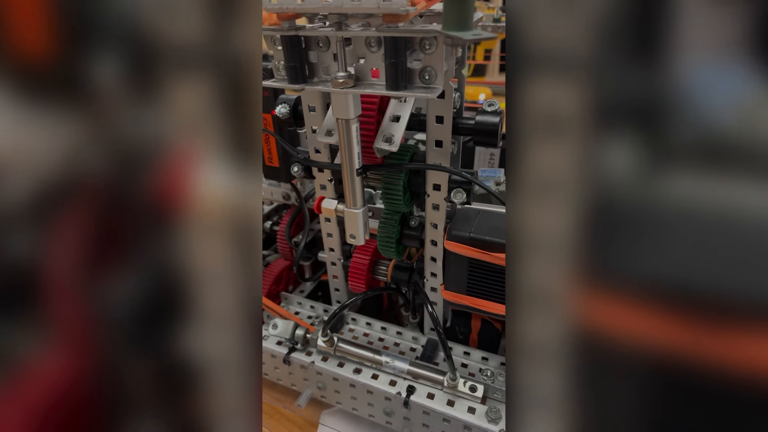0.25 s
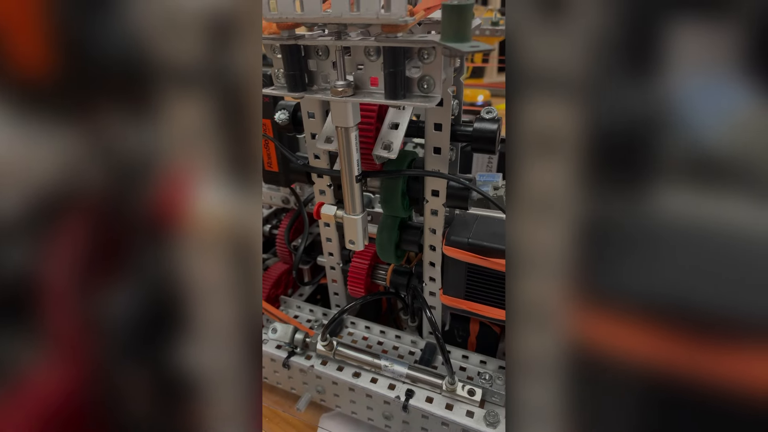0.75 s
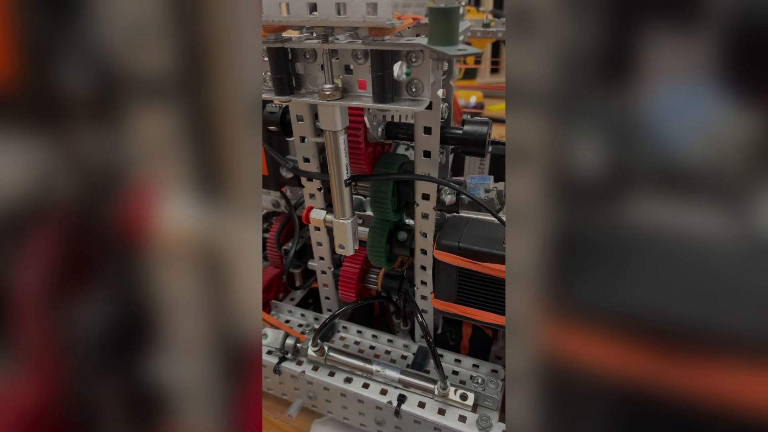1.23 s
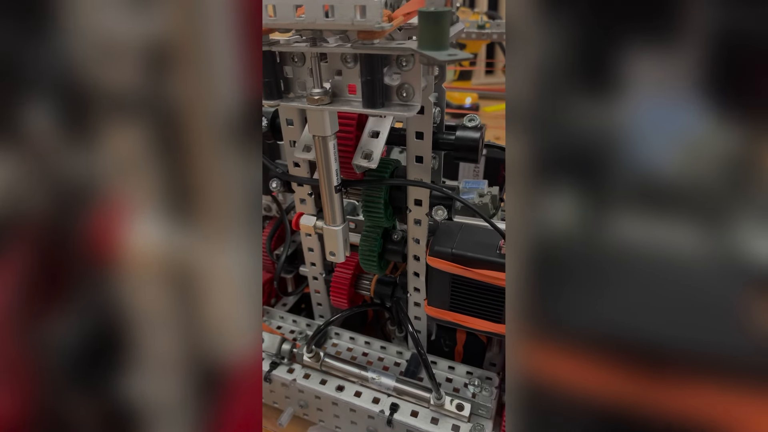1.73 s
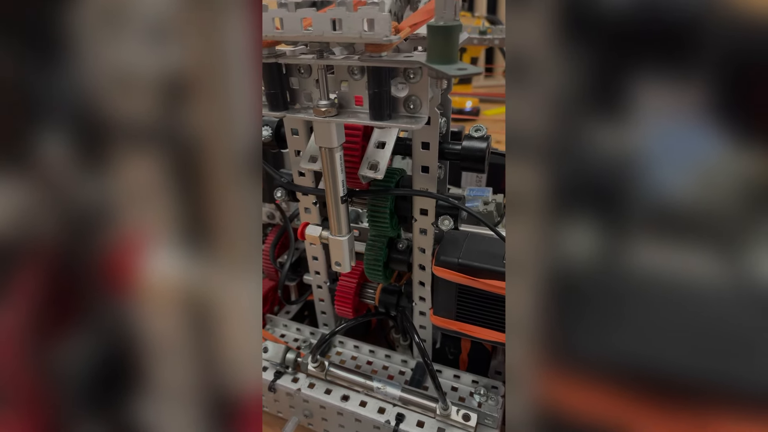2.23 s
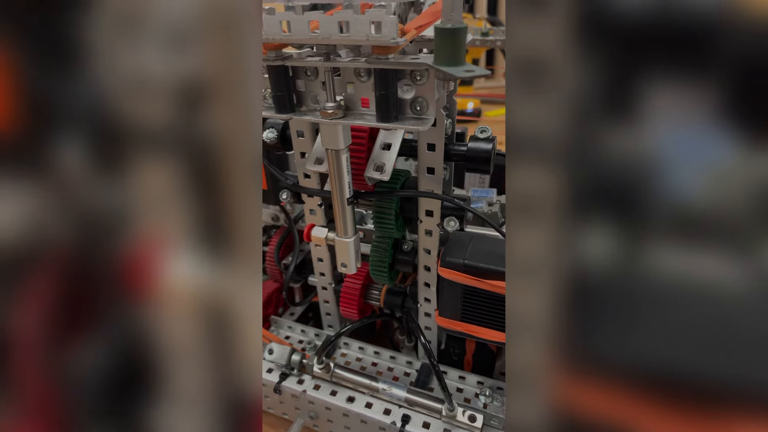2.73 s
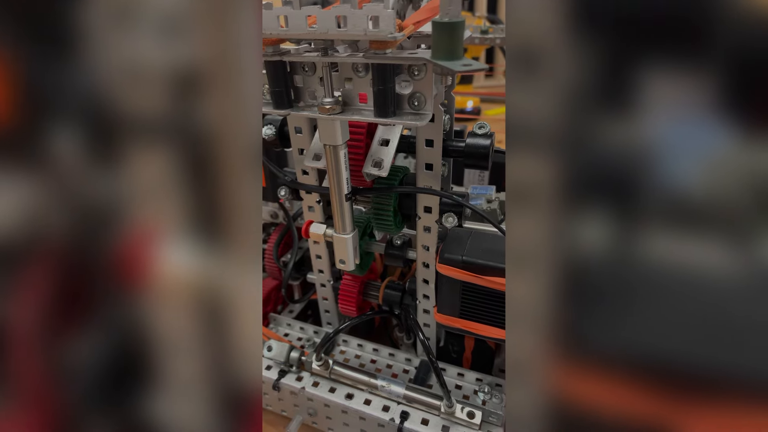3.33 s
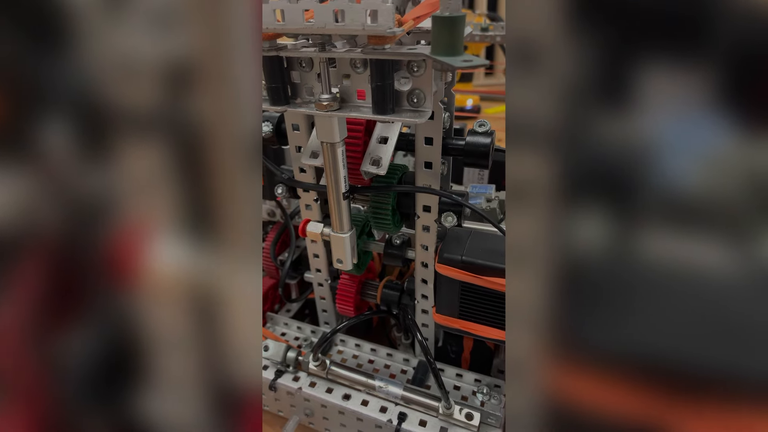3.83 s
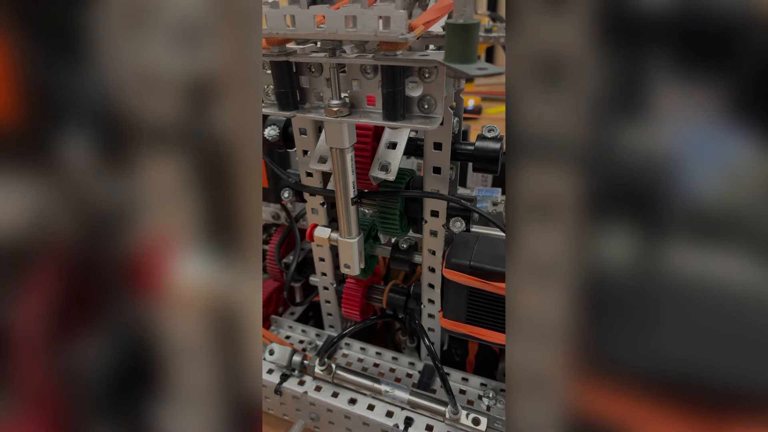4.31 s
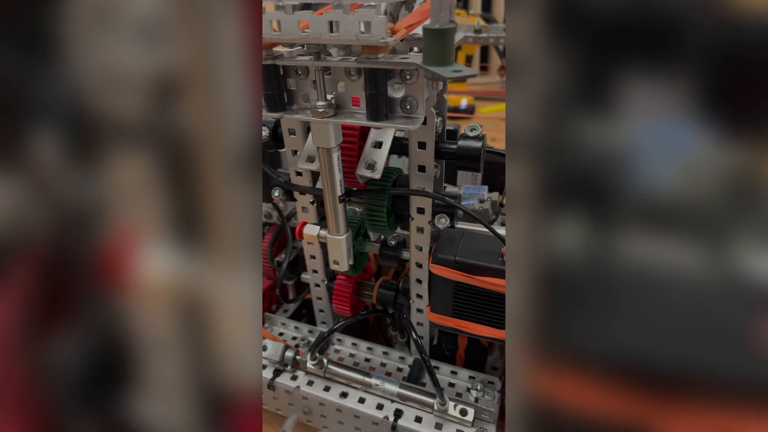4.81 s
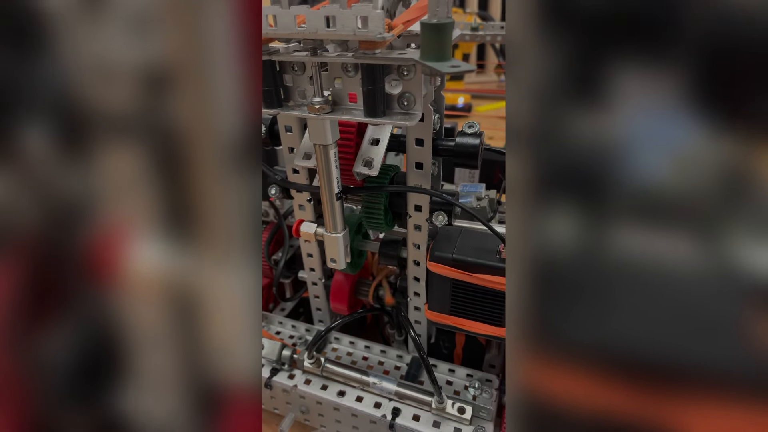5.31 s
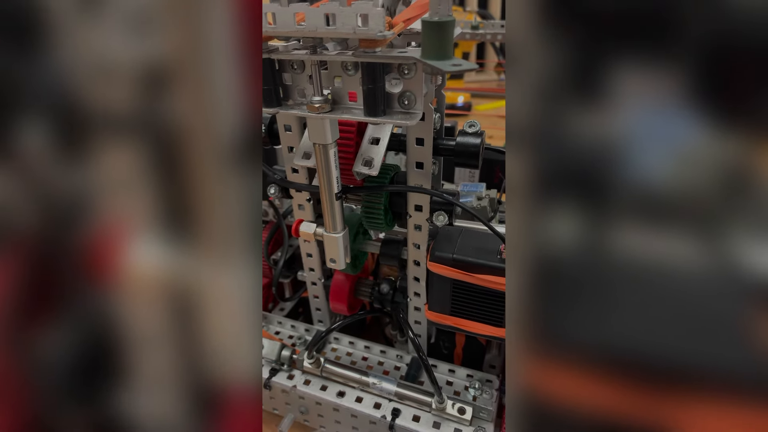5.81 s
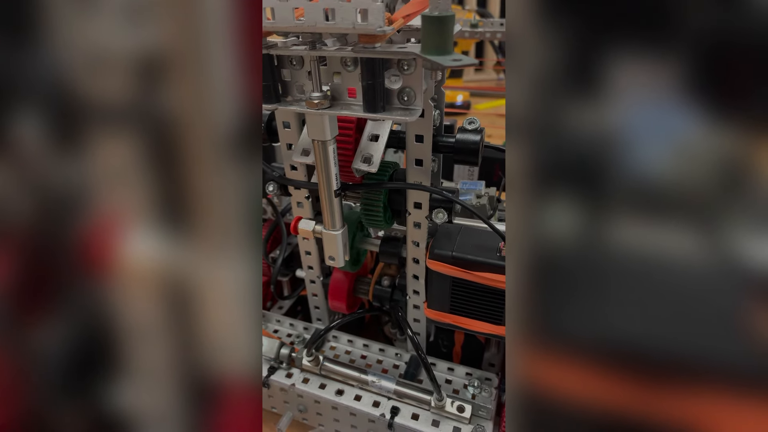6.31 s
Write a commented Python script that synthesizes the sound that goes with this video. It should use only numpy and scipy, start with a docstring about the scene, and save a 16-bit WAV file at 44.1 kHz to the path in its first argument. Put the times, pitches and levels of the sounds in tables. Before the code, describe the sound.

Close by in a faintly humming workshop, a valve knocks and hissing air drives a small robot's piston with a falling squeal and a low groan. The metal frame rattles and the piston hits its stop, leaving a faint hollow tone. Gears and linkage are clacked over by hand a few times, while parts clatter far off. The valve knocks again, and air spits, then hisses steadily to the end.

```python
"""A small pneumatic robot in a humming workshop, with parts clattering far off now and then.
At 0.5 s a valve knocks and air drives a groaning, squealing piston; from 1.3 s the frame rattles and
the piston hits its stop, leaving a faint hollow tone. Gears and linkage are clacked over by hand
(2.9-3.8 s). At 5 s the valve knocks again and the air spits, then hisses to the end.
A close pair of microphone ports hears the treble with a short lag between its sides."""
import sys
import numpy as np
from scipy import signal
from scipy.fft import rfft, irfft, next_fast_len
from scipy.io import wavfile
from scipy.ndimage import uniform_filter1d, map_coordinates

SR = 44100
rng = np.random.default_rng(int(sys.argv[2]) if len(sys.argv) > 2 else 0)


def unload_wav(signal):
    """Save mono or channel-first audio to the path in sys.argv[1] as 16-bit WAV at rate SR, clipped to [-1, 1]."""
    wavfile.write(
        sys.argv[1],
        SR,
        np.round(np.clip(np.atleast_2d(signal).T, -1, 1) * 32767).astype(np.int16),
    )


N = 289296
STROKE_OPEN_S = .58

# Air port spectrum during the stroke. Each row: frequency in Hz, relative level in dB.
PORT_SPECTRUM = [(20, -46.5), (100, -11), (550, -19), (1400, -5.5), (2300, -14.5), (3200, -3.5),
                 (4000, -2.5), (5500, -3.5), (6800, 0), (8300, -8), (10000, -5), (11000, -8.5),
                 (12500, -6.5), (15500, -11.5)]
# Air outlet resonances. Each row: centre in Hz, width in Hz, lift in dB.
OUTLET_RESONANCES = [(2870, 350, 4), (5660, 590, 5.5), (6300, 310, -5), (6900, 420, 6.5), (7400, 350, 5),
                     (7700, 250, -4.5), (8230, 320, 7.5), (9600, 250, 4.5), (9880, 250, 3),
                     (10648, 220, -4), (11096, 420, 12.5)]
# Bright spectrum of metal contact. Each row: frequency in Hz, relative level in dB.
SNAP_SPECTRUM = [(300, -41.5), (1500, -9), (2600, -10.5), (3500, -1), (5000, 3), (7000, -2), (9000, 3),
                 (11000, 0), (13000, -1), (15500, -7)]


def air(jerks):
    """Air surges until the line fills, then flows steadily: once for the stroke, once to blow off."""
    # Filling and blow-off spectra. Each row: frequency in Hz, relative level in dB.
    surge_spectrum = [(20, -46), (120, -11.5), (280, -18), (500, -23), (1000, -17.5), (1500, -16.5),
                      (2000, -5.5), (2350, -13), (3100, -3.5), (3900, -6), (4500, -6.5), (6000, 0),
                      (8700, 1), (10000, 0), (12500, -3.5), (15500, -3.5)]
    blow_off_spectrum = [(20, -51), (120, -14), (550, -22), (950, -15), (1300, -11), (2300, -14.5),
                         (3100, -4), (3900, -6.5), (5200, -3), (8500, 0.5), (10000, -3.5), (12500, -6),
                         (15500, -6)]
    # Brief swells of the hiss. Each row: time in seconds, lift in dB.
    spurts = [(.69, 3), (.795, 3), (5.06, 2.5), (5.235, 1.5), (5.54, 2.5), (5.65, 3), (6.06, 3),
              (6.19, 4.5)]
    t = np.arange(N) / SR
    swells = amp(sum(db * np.exp(-((t - s) / .021) ** 2) for s, db in spurts))
    surge = jet(surge_spectrum, patchy_db=2.9, flutter_db=2.0, flutter_hz=140)
    stroke = amp(-26.5) * jet(PORT_SPECTRUM, patchy_db=2.5, flutter_db=1.0, flutter_hz=130)
    stroke += amp(-20.5) * np.exp(-since(.79) / .03) * surge
    stroke *= envelope(STROKE_OPEN_S, end_s=1.268, attack_s=.032, fade_db_per_s=199.5)
    blow_off = amp(-25) * jet(blow_off_spectrum, patchy_db=1.64, flutter_db=1.13, flutter_hz=110)
    blow_off += amp(-20.8) * np.exp(-since(5.3) / .007) * surge
    blow_off *= envelope(4.99, end_s=N / SR, attack_s=.034)
    return swells * (jerks * stroke + blow_off)


def jet(spectrum, patchy_db, flutter_db, flutter_hz):
    """Outlet turbulence: the whole flutters, and each band flares and fades by itself."""
    bands = signal.stft(noise(spectrum, peaks=OUTLET_RESONANCES), nperseg=256)[2]
    flares = uniform_filter1d(rng.standard_normal(bands.shape[1:]), size=6, axis=0)
    flares = uniform_filter1d(flares, size=11, axis=1)
    patchy = signal.istft(bands * amp(patchy_db * unit(flares)), nperseg=256)[1][:, :N]
    return unit(amp(flutter_db * wobble(flutter_hz)) * patchy)


def piston_jerks(rate_hz=34.09, depth_db=1.5, drift=.015):
    """Gain that pumps as the piston creeps in regular jerks once air is let in."""
    moving = since(STROKE_OPEN_S) > 0
    cycles = np.cumsum(moving * rate_hz * (1 + drift * wobble(13))) / SR
    return unit(amp(-depth_db * np.sin(2 * np.pi * cycles)))


def seal_squeal(jitter=.012, waver=.007, flutter_db=3, rasp_db=2.7):
    """The sliding seal squeals; harmonics flare as they cross cylinder and outlet resonances."""
    # Quick drop, then small steps. Each row: time in seconds, pitch in Hz.
    glide = [(0.79, 2094), (0.822, 1907), (0.83, 1729), (0.87, 1706), (0.885, 1642), (1.019, 1586),
             (1.049, 1598), (1.068, 1511), (1.15, 1444), (1.194, 1456), (1.218, 1409), (1.27, 1464)]
    # Seal harmonics from the first up. Each entry: level in dB before colouring.
    harmonics_db = [-8, 0, 3.5, -2, -5, -7, -4, -9, -12]
    # Cylinder resonances and dips. Each row: centre in Hz, width in Hz, lift in dB.
    cylinder_peaks = [(1400, 200, 3), (2880, 300, -4), (3420, 220, 2.5), (4400, 300, 3.5), (5120, 300, 3),
                      (6850, 300, 1), (8600, 400, 3)]
    pitch_hz = np.interp(np.arange(N) / SR, *np.transpose(glide)) * (1 + waver * wobble(70))
    phase = 2 * np.pi * np.cumsum(pitch_hz * (1 + jitter * wobble(700))) / SR
    hz = np.arange(SR // 2)
    outlet_db = colour_db(PORT_SPECTRUM, OUTLET_RESONANCES + cylinder_peaks, hz)
    tone = np.zeros(N)
    for k, db in enumerate(harmonics_db, 1):
        level_db = db + np.interp(k * pitch_hz, hz, outlet_db) + flutter_db * wobble(70)
        tone += amp(level_db) * np.sin(k * phase)
    stroke = envelope(.78, end_s=1.266, attack_s=.025, sag_db_per_s=10.5, fade_db_per_s=600)
    return amp(-25.5) * stroke * unit(amp(rasp_db * wobble(450))) * tone


def cylinder_groan(start_hz=219.48, end_hz=160, glide_s=.2, jitter=.05, rough_db=3):
    """The cylinder groans in rough spells, its pitch gliding down."""
    # Groan spells. Each row: start in seconds, length in seconds, level in dB.
    spells = [(.548, 0.059, -41), (0.828, .18, -47.5)]
    pitch_hz = end_hz + (start_hz - end_hz) * np.exp(-since(spells[0][0]) / glide_s)
    tone = np.sin(2 * np.pi * np.cumsum(pitch_hz * (1 + jitter * wobble(87))) / SR)
    level = sum(amp(db) * envelope(s, s + length_s, attack_s=.03, fade_db_per_s=133.5)
                for s, length_s, db in spells)
    return level * unit(tone * amp(rough_db * wobble(60)))


def clacks(rise_s=.00028, hold_s=.0011, body_life=1.3, tilt_hz=600, wet_db=-16.5):
    """Parts clack and air spits: each a faint lead-in, a bright snap, a longer body and a room wash."""
    # Gear, link and stop contacts. Each row: start in seconds, snap in dB, body in dB,
    # snap t60 in seconds, snap tilt in dB per octave, strongest ring in Hz.
    contacts = [(.4605, -48.5, -63, 0.01732, -1, 11000), (.535, -53, -46.5, 0.036, -1.5, 6500),
                (1.278, -20.5, -34, 0.022, 1.5, 11000), (1.3401, -23.5, -29.5, .02, 0, 1480),
                (1.3434, -12, -29.5, 0.054, 1.5, 11150), (1.3525, -15, -27.5, .045, 1.5, 6800),
                (1.365, -15.5, -32.5, .03, -0.5, 7000), (1.401, -22.5, -39, 0.034, 0, 7200),
                (1.4305, -15.5, -41.5, .018, 1, 6700), (1.4499, -22, -42.5, 0.02936, 2.5, 11300),
                (1.472, -25.5, -40.5, 0.047, -0.5, 6900), (1.5103, -10, -36, 0.021, 2.5, 7060),
                (1.581, -13, -43, 0.028, 4.5, 13700), (1.633, -14.5, -44.5, .014, 6.5, 6600),
                (1.651, -29, -50.5, .02, 2, 9000), (1.662, -35, -58, 0.021, 3.5, 11500),
                (1.732, -39, -53, 0.14, 1, 6690), (1.8833, -46, -45.5, .03, -14, 1080),
                (1.9155, -43.5, -54, .14, -6.5, 850), (2.638, -71.5, -71, .02, -4, 1099),
                (2.896, -29.5, -39, 0.012, -3.5, 6802), (2.9427, -8.5, -22, 0.021, 1.5, 8400),
                (2.9485, -18, -30, .025, 0, 12300), (3.1525, -10, -29.5, 0.019, -1.5, 8050),
                (3.3935, -49, -69.5, .006, 0.5, 8600), (3.7192, -15, -24.5, 0.017, 1.5, 6850),
                (3.725, -25, -34.5, 0.01602, 0, 2004), (3.76, -25.5, -30, 0.027, 3, 1992),
                (3.7662, -8, -21.5, 0.019, 6.5, 7600), (3.774, -14, -44, 0.015, 9, 11700),
                (3.782, -34, -60, 0.14, 9, 7600), (4.946, -49, -45, .02, -9, 710),
                (5.0506, -18.5, -31.5, .014, -3, 3400), (5.116, -18, -27, 0.017, -3.5, 2040)]
    # Air breaking through valve and fittings. Each row: start in seconds, snap in dB.
    air_spits = [(0.5797, -23.5), (4.987, -26.5), (4.997, -23), (5.2221, -15), (5.24, -18), (5.271, -22),
                 (5.301, -13), (5.452, -24)]
    # Metalwork resonances. Each row: centre in Hz, width in Hz, lift in dB.
    metal_peaks = [(1980, 190, 4.5), (2850, 120, 7), (3480, 750, 2.5), (5600, 200, 1), (6600, 500, 3.5),
                   (11300, 480, -2.5)]
    # Body and room wash spectra. Each row: frequency in Hz, relative level in dB.
    body_spectrum = [(60, -7), (300, -6), (700, 6), (1400, 4.5), (2100, 5), (3000, -15), (6000, -34.5)]
    wash_spectrum = [(60, -16), (300, -9), (800, -9.5), (1500, -3.5), (2600, -6), (3500, 0), (5000, 2),
                     (7000, 1.5), (9000, -0.5), (11000, -4), (15500, -4.5)]
    # Lead-in, main hit, neighbours ringing on. Each row: delay in seconds, gain in dB, t60 factor.
    stages = [(-.004, -20, 1), (0, 0, 1), (0, -22, 5.3)]
    spits = [(s, db, db - 25, .01, 1, 11100) for s, db in air_spits]
    out, t = np.zeros((2, N)), np.arange(SR // 8) / SR
    bright, dull = noise(SNAP_SPECTRUM, peaks=metal_peaks), noise(body_spectrum, peaks=metal_peaks)
    fading_s = np.maximum(t - hold_s, 0)
    for s, snap_db, body_db, t60_s, tilt_db, ring_hz in contacts + spits:
        ring = lambda hz: amp(resonance_db(hz, ring_hz, width_hz=500, lift_db=9.5))
        tilted_ring = lambda hz: ring(hz) * amp(tilt_db * np.log2(1 + hz / tilt_hz))
        energy = 0
        for delay_s, db, life in stages:
            first = round((s + delay_s) * SR)
            span = slice(first, first + len(t))
            decay_db = 60 * fading_s / (t60_s * life)
            snap = amp(snap_db - decay_db) * unit(filtered(bright[:, span], tilted_ring))
            body = amp(body_db - decay_db / body_life) * filtered(dull[:, span], ring)
            contact = amp(db) * (snap + body) * (1 - np.exp(-t / rise_s))
            add(out, s + delay_s, contact)
            energy += np.sum(contact ** 2)
        wash = tail(wash_spectrum)
        add(out, s, amp(wet_db) * np.sqrt(energy) * wash / np.linalg.norm(wash))
    return out


def knocks():
    """Dull blows on valve, gears, frame and plate excite each part's modes."""
    # Blows on each part. Each row: start in seconds, level in dB.
    valve_blows = [(.536, -25), (.684, -28.5), (1.284, -34), (4.947, -24.5), (5.116, -19.5)]
    gear_blows = [(1.284, -29.5), (2.9442, -15), (3.7665, -14.5)]
    frame_blows = [(1.363, -15.5), (1.407, -17.5), (1.475, -16.5), (1.718, -29.5)]
    plate_blows = [(1.527, -32), (1.603, -23.5)]
    # Modes of each part. Each row: nominal pitch in Hz, gain in dB, rise in seconds.
    valve_modes = [(750, 0.5, 0.00056), (2040, -22.5, .0009)]
    gear_modes = [(337, 1, 0.0009), (215, -4.5, .002), (95, -12, 0.0035)]
    frame_modes = [(117, 0, 0.0049), (71, -2, 0.0057)]
    plate_modes = [(889.49, 0.5, 0.005), (1050, -9.5, 0.0049), (527, -5, 0.0084)]
    return (thumps(valve_blows, valve_modes) + thumps(gear_blows, gear_modes)
            + thumps(frame_blows, frame_modes) + thumps(plate_blows, plate_modes, start_ratio=.97, fall=0))


def end_stop(waver_rad=.6):
    """The piston hits its stop with a short, unsteady ring; a faint, low, hollow tone lingers."""
    # Blows on the stop. Each row: start in seconds, level in dB.
    blows = [(1.5728, -10), (1.598, -18.5)]
    # Stop modes. Each row: nominal pitch in Hz, gain in dB, rise in seconds.
    stop_modes = [(85, -17, .006), (193, -8.5, .003), (365, 0.5, .0014), (996, -2, .0014),
                  (1324, -9, .0017)]
    # Tones after each blow. Each row: frequency in Hz, gain in dB, t60 in seconds.
    after_tones = [(180.5, -29, 0.76), (251, -27.5, .6), (325, -45.5, 2.9), (380, -28.5, .35),
                   (451, -25, .35), (490, -24.5, .25), (890, -23, 0.13), (1105, -21, .2), (1448, -27, .25)]
    out = thumps(blows, stop_modes)
    for hz, tone_db, t60_s in after_tones:
        level = sum(amp(db + tone_db + rng.normal(0, 2) - 60 * since(s) / t60_s) * (since(s) > 0)
                    for s, db in blows)
        out += level * np.sin(2 * np.pi * hz * since(blows[0][0]) + waver_rad * wobble(40))
    return out


def thumps(blows, modes, start_ratio=1.2, fall=.11):
    """High bending waves run faster, so each blow is a falling chirp; fall=0 holds the pitch."""
    out, t = np.zeros(N), np.arange(SR // 8) / SR
    for hz, mode_db, rise_s in modes:
        age = t / rise_s
        phase = 2 * np.pi * np.cumsum(hz * start_ratio / (1 + fall * age)) / SR
        pulse = (age / 2) ** 2 * np.exp(2 - age) * np.sin(phase)
        for s, db in blows:
            add(out, s, amp(db + mode_db) * pulse)
    return out


def frame_shake(grain_db=1.5, lumpy_db=2.5):
    """The frame shudders after each jolt and its loose parts chatter."""
    # Jolts. Each row: start in seconds, length in seconds, rumble in dB, rattle in dB.
    jolts = [(1.34, 0.17, -25.5, -19), (1.558, 0.022, -31, -38.5), (1.673, 0.041, -37.5, -43.5)]
    # Frame rumble spectrum. Each row: frequency in Hz, relative level in dB.
    rumble_spectrum = [(20, -24), (48, -5), (115, -2), (170, -4), (380, -10.5), (600, -16), (900, -14.5),
                       (1250, -19), (2000, -25.5), (4000, -45)]
    rumble_level, rattle_level = np.zeros((2, N))
    for s, length_s, rumble_db, rattle_db in jolts:
        shudder = envelope(s, s + length_s, attack_s=.018, sag_db_per_s=12.5, fade_db_per_s=60.5)
        chatter = envelope(s, s + length_s, attack_s=.003, sag_db_per_s=64, fade_db_per_s=298)
        rumble_level = np.hypot(rumble_level, amp(rumble_db) * shudder)
        rattle_level = np.hypot(rattle_level, amp(rattle_db) * chatter)
    rumble = unit(amp(lumpy_db * wobble(45)) * noise(rumble_spectrum))
    rattle = unit(amp(grain_db * wobble(200)) * noise(SNAP_SPECTRUM))
    return rumble_level * rumble + rattle_level * rattle


def frame_echoes(x, echo_db=-9, t60_s=.07):
    """Quick reflections among the metal plates ripple the treble with fine peaks."""
    t = np.arange(SR // 16) / SR
    response = noise([(200, -24), (1500, 8.5), (4000, -2), (16000, -3.5)], size=len(t))
    echoes = convolved(x, response * amp(-60 * t / t60_s))
    return (x + amp(echo_db) * echoes) / np.hypot(1, amp(echo_db))


def far_clatter(detune=.06, rough_db=1.5):
    """Distant parts swell unevenly into the room, each at its own pitches; a hollow one is set down."""
    # Parts handled. Each row: start in seconds, bright level in dB, dull level in dB, swell in seconds.
    parts = [(0, -67, -42.5, 0.014), (.03, -54, -53.5, 0.01), (.22, -85, -50, 0.0033),
             (.425, -71, -49.5, 0.0067), (2.235, -60, -54, 0.03), (2.43, -66.5, -74, .03),
             (2.708, -68, -65, .001), (3.564, -66, -45.5, 0.004), (3.587, -41.5, -43, .005),
             (3.875, -39.5, -37, 0.026), (4.0, -39.5, -49.5, 0.0026), (4.27, -52, -47.5, 0.02),
             (4.397, -45, -43, 0.00411), (4.423, -33, -49.5, 0.0047), (4.759, -55, -49.5, 0.0051)]
    # Their two spectra. Each row: frequency in Hz, relative level in dB.
    bright_spectrum = [(60, -57.5), (500, -21.5), (1800, -2), (2700, -5.5), (4300, -1.5), (6000, 0.5),
                       (8500, 2.5), (10800, 2), (13600, -4), (15500, -7)]
    dull_spectrum = [(20, -44.5), (80, -26.5), (200, -8), (330, 2), (550, -5.5), (900, 0), (1200, 4),
                     (1800, -4), (3000, -9), (7000, -24.5)]
    # Their resonances. Each row: mean centre in Hz, width in Hz, lift in dB.
    part_peaks = [(330, 40, 4), (1250.4, 110, 5), (3670, 250, 3), (5470, 200, 4), (6601, 180, 6.8),
                  (7850, 160, 6), (9180, 300, 7), (9980, 180, 5.7), (13700, 130, 7.8)]
    # Knocks of the hollow part. Each row: start in seconds, level in dB.
    hollow_blows = [(3.56, -41.5), (3.598, -38), (4.105, -49.5), (4.415, -42)]
    # Its modes. Each row: pitch in Hz, gain in dB, rise in seconds.
    hollow_modes = [(327, -2.5, 0.0083), (864, -8, 0.0066), (1270, -9, .003)]
    out, t = np.zeros((2, N)), np.arange(SR) / SR
    for s, bright_db, dull_db, swell_s in parts:
        peaks = [(hz * (1 + detune * rng.standard_normal()), width, db) for hz, width, db in part_peaks]
        wash = amp(bright_db) * tail(bright_spectrum, peaks) + amp(dull_db) * tail(dull_spectrum, peaks)
        add(out, s, wash * (1 - np.exp(-t / swell_s)))
    return out * amp(rough_db * wobble(45)) + thumps(hollow_blows, hollow_modes, start_ratio=1, fall=0)


def room(x, wet_db=-16):
    """The workshop answers close sounds with a long, weak tail."""
    response = tail([(20, -27), (60, -.5), (250, 3.5), (800, -1.5),
                     (3000, 3), (6000, 2), (10000, -4.5), (15000, -3)])
    return amp(wet_db) * convolved(x[:1], response)


def tail(spectrum, peaks=()):
    """One second of room sound; each frequency dies at its own rate."""
    # Room decay. Each row: frequency in Hz, t60 in seconds.
    decay_times = [(100, 0.91), (400, 0.74), (1500, 0.81), (3000, 0.8), (5000, 0.89), (9000, 0.46),
                   (15000, 0.51)]
    hz, t, bands = signal.stft(noise(spectrum, size=SR, peaks=peaks), SR, nperseg=256)
    decay = amp(-60 * t / along(decay_times, hz)[:, None])
    return signal.istft(bands * decay, SR, nperseg=256)[1][:, :SR]


def workshop(rumble_db=-59, sag_db_per_s=1.13):
    """Low background rumble, louder at first and slowly fading, and slightly unsteady mains hum."""
    # Mains hum. Each row: frequency in Hz, level in dB.
    hum_tones = [(61, -69.5), (121, -67.5), (240, -71.5)]
    # Background rumble spectrum. Each row: frequency in Hz, relative level in dB.
    background_spectrum = [(20, -32), (40, -13.5), (60, 6), (90, -2), (125, -5), (170, -4.5), (240, -7.5),
                           (330, -19), (480, -30), (900, -34.5), (2000, -30), (4000, -25), (7000, -41.5),
                           (10000, -60), (16000, -72.5)]
    t = np.arange(N) / SR
    hum = sum(amp(db) * unit(np.sin(2 * np.pi * hz * t + .5 * wobble(7.2))) for hz, db in hum_tones)
    return hum + amp(rumble_db - sag_db_per_s * t) * noise(background_spectrum)


def noise(spectrum, size=N, peaks=()):
    """Coloured stereo noise of rms 1, partly shared by both sides."""
    # Stereo likeness. Each row: frequency in Hz, left-right correlation.
    likeness = [(100, 0.9857), (280, 0.94), (650, 0.18), (2400, 0.21), (4500, 1), (15000, 1)]

    def response(hz):
        angle = np.arccos(np.clip(along(likeness, hz), -1, 1)) / 2
        return amp(colour_db(spectrum, peaks, hz)) * [np.cos(angle), np.sin(angle)]

    mid, side = filtered(rng.standard_normal((2, size)), response)
    return unit(np.array([mid + side, mid - side]))


def colour_db(spectrum, peaks, hz):
    """A broad spectrum with resonances and dips."""
    return along(spectrum, hz) + sum(resonance_db(hz, *peak) for peak in peaks)


def resonance_db(hz, centre_hz, width_hz, lift_db):
    """One bell-shaped peak."""
    return lift_db / (1 + (2 * (hz - centre_hz) / width_hz) ** 2)


def along(points, hz):
    """(Hz, value) points read on a log axis."""
    knots_hz, values = np.transpose(points)
    return np.interp(np.log(hz + 1), np.log(knots_hz + 1), values)


def filtered(x, response):
    """x through a complex frequency response."""
    size = next_fast_len(x.shape[-1] + SR // 4)
    return irfft(rfft(x, size) * response(np.fft.rfftfreq(size, 1 / SR)), size)[..., :x.shape[-1]]


def convolved(x, response):
    """x through a stereo impulse response scaled to unit energy on the left."""
    return signal.fftconvolve(x, response / np.linalg.norm(response[0]), axes=1)[:, :N]


def envelope(start_s, end_s, attack_s, sag_db_per_s=0, fade_db_per_s=0):
    """Soft attack, sagging hold, fade after the end."""
    t = since(start_s)
    return (1 - np.exp(-(t / attack_s) ** 2)) * amp(-sag_db_per_s * t - fade_db_per_s * since(end_s))


def since(s):
    """Seconds since time s, zero before it."""
    return np.maximum(np.arange(N) / SR - s, 0)


def wobble(rate_hz):
    """Smooth random curve, rate_hz knots a second."""
    knots = rng.standard_normal(int(N * rate_hz / SR) + 4)
    return map_coordinates(knots, [np.arange(N) * rate_hz / SR])


def add(track, s, sound):
    """Mix a sound into the track at time s."""
    part = track[..., max(round(s * SR), 0):][..., :sound.shape[-1]]
    part += sound[..., :part.shape[-1]]


def amp(db):
    """Decibels to gain."""
    return 10 ** (np.asarray(db) / 20)


def unit(x):
    """x at rms 1."""
    return x / np.sqrt(np.mean(x ** 2) + 1e-20)


def scene():
    """The robot close by, the room around it."""
    jerks = piston_jerks()
    hiss = air(jerks)
    blows = knocks() + end_stop()
    robot = frame_echoes(hiss) + jerks * seal_squeal() + cylinder_groan() + frame_shake() + blows
    return robot + clacks() + room(robot) + far_clatter() + workshop()


def record(dry, low_cut_hz=36, top_hz=15700):
    """Two microphone ports differ in phase; deep bass is cut and the top falls away steeply."""
    # Lead of the left port. Each row: frequency in Hz, phase in radians.
    lead = [(0, 0), (450, -.3), (1000, -1.9), (1380, -6.3), (2000, -5.2), (3000, -5), (4650, -3.14),
            (7000, 0), (9000, 3.14), (13200, 9.42), (17000, 15)]

    def response(hz):
        lead_rad = np.interp(hz, *np.transpose(lead))
        band = 1 / np.sqrt((1 + (hz / top_hz) ** 240) * (1 + (low_cut_hz / (hz + 1)) ** 8))
        return np.exp(.5j * np.outer([1, -1], lead_rad)) * band

    return filtered(dry, response)


dry = scene()
out = record(dry)
unload_wav(out)
```